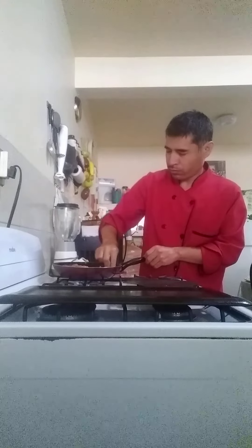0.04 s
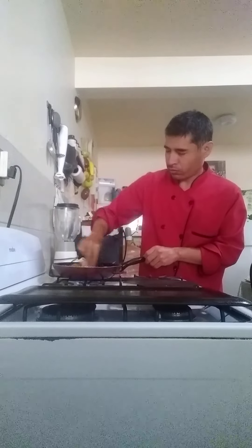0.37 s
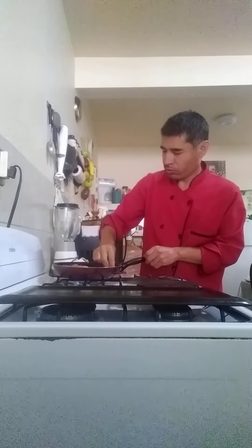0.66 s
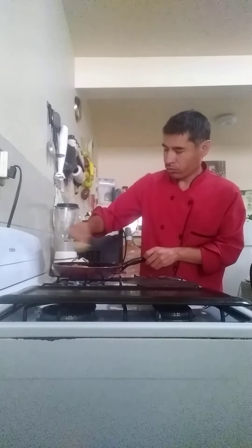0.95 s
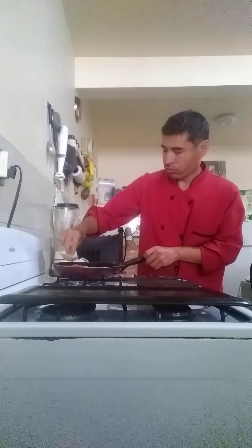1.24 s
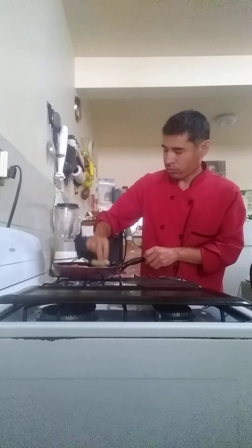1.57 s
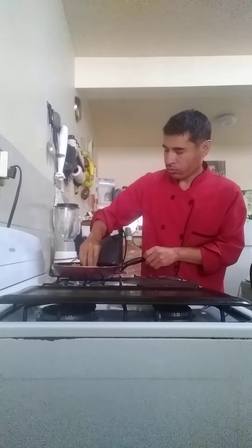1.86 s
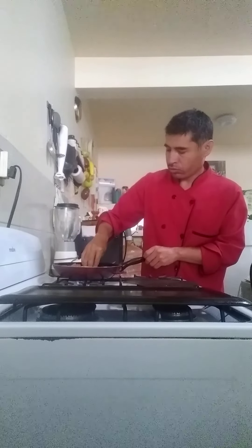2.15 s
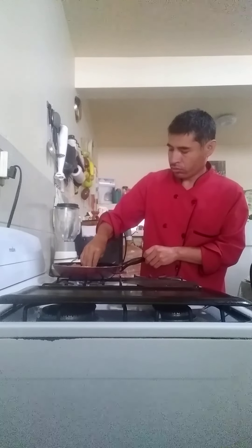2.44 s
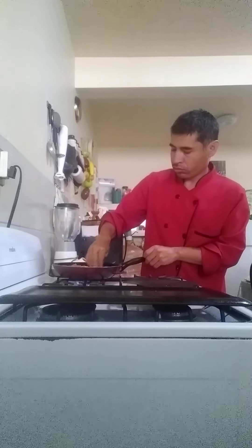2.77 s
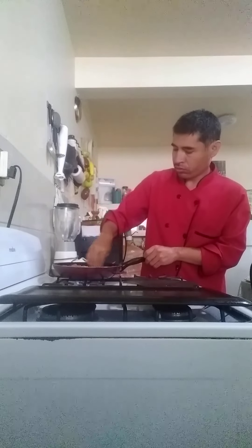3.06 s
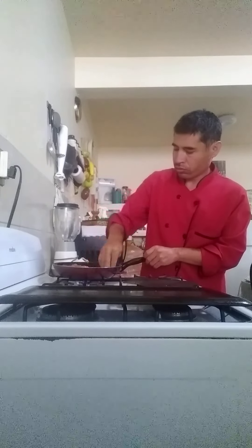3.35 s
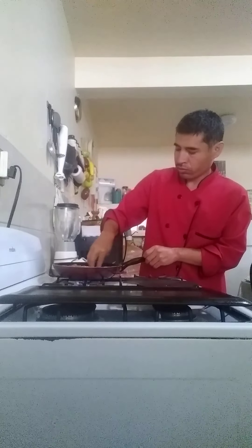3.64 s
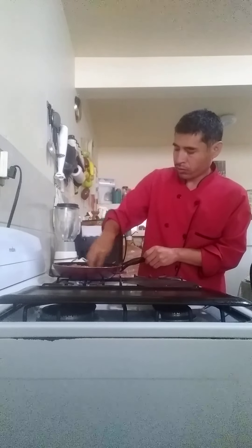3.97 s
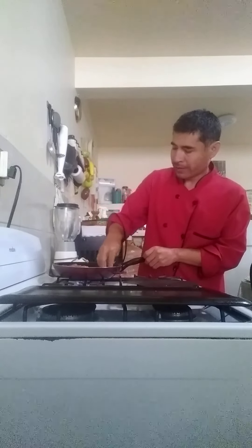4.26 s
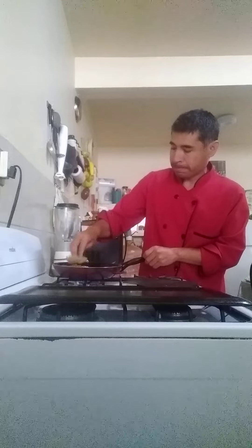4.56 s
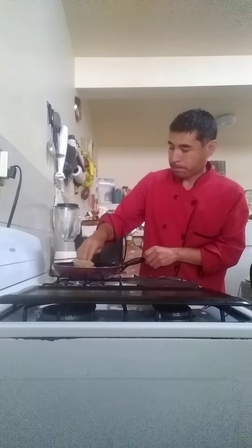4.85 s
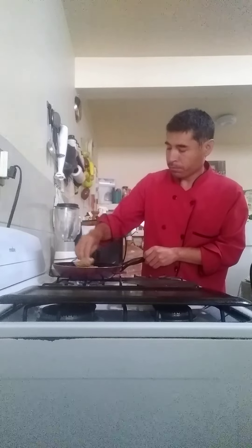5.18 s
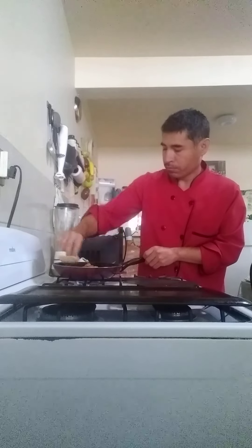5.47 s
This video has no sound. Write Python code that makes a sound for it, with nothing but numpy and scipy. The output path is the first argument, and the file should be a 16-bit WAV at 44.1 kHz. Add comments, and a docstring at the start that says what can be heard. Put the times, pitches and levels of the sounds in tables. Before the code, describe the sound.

A frying pan clanks and rattles on a stove grate while food is wiped around it with a soft, scratchy hiss.

```python
"""Wiping food round a loose frying pan

In a hard-walled kitchen, each push of the cook's hand tips the pan against the stove grate. The impact
excites the pan's modes: a dull clack when it is held down, a ringing clank when it rocks free.
Friction of the food on the pan floor makes a hiss. A few bright ticks sound, from the pan touching
the grate again or during the wiping. A faint tone swells twice, and low room noise lies under it all."""
import sys
import numpy as np
from scipy import signal
from scipy.fft import rfft, irfft
from scipy.io import wavfile
from scipy.ndimage import uniform_filter1d

SR = 44100
rng = np.random.default_rng(int(sys.argv[2]) if len(sys.argv) > 2 else 0)


def master_out(mix):
    """Clip the mix to full scale and print it as 16-bit PCM to the path in sys.argv[1]."""
    frames = np.transpose(np.atleast_2d(mix))
    ceiling = np.clip(frames, -1, 1)
    pcm = np.round(ceiling * 32767).astype(np.int16)
    wavfile.write(sys.argv[1], SR, pcm)


N = 247401


def amp(db):
    return 10 ** (np.asarray(db) / 20)


def unit(x):
    return x / np.sqrt(np.mean(x ** 2) + 1e-20)


def curve_at(points, hz):
    f, value = np.transpose(points)
    return np.interp(np.log(hz + 1), np.log(f + 1), value)


def bins(x):
    return np.fft.rfftfreq(x.shape[-1], 1 / SR)


def colour(x, points):
    """Zero-phase filtering by a curve of (frequency [Hz], gain [dB])."""
    return irfft(rfft(x) * amp(curve_at(points, bins(x))), x.shape[-1])


def add(mix, time_s, sound):
    start = round(time_s * SR)
    sound = sound[:, max(-start, 0):]
    part = mix[:, max(start, 0):][:, :sound.shape[1]]
    part += sound[:, :part.shape[1]]


def wander(rate_hz):
    """Random modulation: low-passed noise of unit rms."""
    noise = rng.standard_normal(N)
    return unit(irfft(rfft(noise) / (1 + (bins(noise) / rate_hz) ** 4), N))


# likeness of sound at the two microphone ports: (frequency [Hz], correlation [-1..1])
COHERENCE = [(60, 0), (125, .55), (250, .78), (600, .88), (1100, .97), (1500, .7), (1750, .2), (2100, .9),
             (2250, .995), (2400, .94), (2550, .7), (2780, .15), (3350, .98), (3950, .55), (4300, .92),
             (4450, .98), (4650, .85), (5050, .35), (5550, .85), (6200, .55), (6700, .7), (10000, .28),
             (14000, .3)]
def diffuse(size, coherence=COHERENCE):
    """A diffuse field: noise from all round is only partly coherent at two points."""
    noise = rng.standard_normal((2, size))
    common, separate = rfft(noise)
    alike = np.clip(curve_at(coherence, bins(noise)), -1, 1)
    return irfft(np.array([common, alike * common + np.sqrt(1 - alike ** 2) * separate]), size)


# decay of sound in the kitchen: (frequency [Hz], t60 [s])
REVERB_TIMES = [(100, 1), (260, 0.798), (700, 0.5786), (1800, 0.4046), (4500, 0.67215), (12000, 0.37806)]
def kitchen(x, build_s=0.01006):
    """Reverberation: wall reflections build up, then each band decays exponentially at its own rate."""
    hz, t, bands = signal.stft(diffuse(SR), SR, nperseg=256)
    decay = amp(-60 * t / curve_at(REVERB_TIMES, hz)[:, None])
    onset = 1 - np.exp(-(t / build_s) ** 2)
    tail = signal.istft(bands * decay * onset, SR, nperseg=256)[1]
    return signal.fftconvolve(x, tail / np.linalg.norm(tail[0]), axes=1)[:, :x.shape[1]]


# short-lived modes of metal striking metal: (frequency [Hz], t60 [s], level [dB])
CRACK_MODES = [(901.9, 0.0378, 1), (1146.4, 0.03439, 2), (1399.2, 0.034, 0.5), (1560.4, 0.03259, 0.5),
               (2035.9, 0.04227, -5.5), (2371.3, 0.03137, -5.5), (2755.5, 0.03824, -9.5),
               (3710, 0.06178, -12), (5702.3, 0.0347, -18)]
def crack(t, detune=0.01826, rise_s=0.000448):
    """Impulse excitation: the contact starts all its modes at the same instant."""
    hz, t60, db = np.transpose(CRACK_MODES)[:, :, None]
    hz = hz * (1 + detune * rng.uniform(-0.8896, 1, hz.shape))
    modes = amp(db - 60 * t / t60) * np.sin(2 * np.pi * (hz * t + rng.random(hz.shape)))
    return modes.sum(0) * (1 - np.exp(-t / rise_s))


# crowded resonances of the stove top: (frequency [Hz], spectral level [dB])
STOVE_SPECTRUM = [(45, -37.5), (110, -15), (230, -6), (600, 2.5), (1000, -3.5), (1800, -5), (2200, -10.5),
                  (2700, -4.5), (3900, -15.5), (6000, -20.5), (8000, -27.5), (14000, -39.5)]
def clatter(t, rise_s=0.007003, decay_s=0.02262, buzz_s=0.08617, buzz_db=-14):
    """Modal overlap: dense resonances merge into noise, with a short buzz as the pan settles."""
    decay = np.exp(-t / decay_s) + amp(buzz_db) * np.exp(-t / buzz_s)
    return colour(diffuse(len(t)), STOVE_SPECTRUM) * decay * (1 - np.exp(-t / rise_s))


# modes of pan and grate: (frequency [Hz], unscaled t60 [s], level held [dB], level free [dB])
PAN_MODES = [(111.09, 0.6805, -18.5, -18), (226.31, 0.32665, -3.5, -15), (336.91, 0.5462, -3, -12),
             (463.82, 0.516, -19, -3.5), (513.77, 0.371, -6.5, -8), (597.56, 0.173, -7.5, -15.5),
             (728.18, 0.1846, -9, -2), (817.44, 0.16085, -5, -.5), (887.54, 0.1725, -12.5, -3.5),
             (910.8, 0.21287, -4.5, 6.5), (935.67, 0.1977, 0.5, -4.5), (973.3, 0.3583, -14.5, -5),
             (1139.9, 0.1633, 0.5, -18.5), (1239.6, 0.2127, 0, -14), (1298.2, 0.1716, -3, -19),
             (1453.6, 0.13106, -2.5, -2.5), (1548.6, 0.13496, -3.5, -6), (1744, 0.2538, -10, -9.5),
             (1994.9, 0.08836, 0.5, -18), (2077.7, 0.229, -19.5, -13.5), (2476, 0.1015, -10, -2.5),
             (2530.3, 0.2373, -10.5, -2.5), (2693, 0.1701, -17.5, -14), (3123.4, 0.4192, -16, 1.5),
             (4047.7, 0.3735, -22.5, -2), (4381, 0.25, -26, -12)]
ROCK_HZ, ROCK_RAD = 28.131, 0.548  # a free pan shivers: mean rate, depth of phase modulation
RIM_HZ, RIM_SWELL_S = 2900, 0.03847  # higher modes lie in the rim, which the blow reaches late
def pan_ring(t, freedom, held_sustain=0.6684, free_extra=0.273, build_cycles=0.5537, detune=0.003948):
    """Damped modal vibration: the hand shortens the pan's ring, and rocking makes it waver."""
    hz, t60, held_db, free_db = np.transpose(PAN_MODES)[:, :, None]
    phase, rock_phase, rock_speed = rng.random((3, len(PAN_MODES), 1))
    scatter_db, shift = rng.standard_normal((2, len(PAN_MODES), 1))
    hz = hz * (1 + detune * shift)  # the pan never lands twice on the same spot
    t60 = t60 * (held_sustain + free_extra * freedom)
    db = held_db + freedom * (free_db - held_db) + scatter_db
    envelope = amp(db - 60 * t / t60) / np.sqrt(t60)
    envelope *= 1 - np.exp(-t * hz / build_cycles)  # low modes swell more slowly
    envelope *= np.where(hz > RIM_HZ, (1 - np.exp(-t / RIM_SWELL_S)) ** 4, 1)
    sway = freedom * ROCK_RAD * np.sin(2 * np.pi * (ROCK_HZ * (.5 + rock_speed) * t + rock_phase))
    path_rad = rng.uniform(-0.5564, 0.4929, (2, len(PAN_MODES), 1))  # from each mode to each port
    angle = 2 * np.pi * (hz * t + phase) + sway + path_rad
    return (envelope * np.sin(angle.astype(np.float32))).sum(1)


def knock(level_db, freedom, firm_db=-33.5, ring_room_db=-5, clack_room_db=-2):
    """One impact excites crack, clatter and ring; a softer blow has more bass and less treble."""
    def by_freedom(held, free):
        return held + freedom * (free - held)

    size = SR * 2 // 3
    t = np.arange(size) / SR
    clack = amp(by_freedom(held=-1.5, free=-6)) * unit(clatter(t))
    clack += amp(by_freedom(held=-1, free=-11)) * unit(crack(t))
    ring = unit(pan_ring(t, freedom))
    sound = ring + clack + kitchen(amp(ring_room_db) * ring + amp(clack_room_db) * clack)
    softness_db = max(firm_db - level_db, 0)
    bass_db = by_freedom(held=5, free=0) + 0.331 * softness_db
    treble_db = by_freedom(held=0.1509, free=-3) - 1.4892 * softness_db
    padded = np.pad(sound, ((0, 0), (0, SR - size)))
    sound = colour(padded, [(280, bass_db), (600, 0), (1650, 0), (2400, treble_db)])[:, :size]
    return amp(level_db) * sound / np.std(sound[:, t < .04])


# blows of pan on grate: (time [s], level [dB], freedom [0 held down to 1 rocking free])
PAN_BLOWS = [(-0.035, -30, 0.6458), (0.2447, -30, 0), (0.4362, -40, 0), (0.5355, -30.5, 0.7845),
             (0.9457, -57.5, 0.046), (1.0428, -60.5, 0.0052), (1.3445, -59, 0.705), (1.4707, -59, 0.6595),
             (1.643, -43.5, 0.1707), (1.696, -47, 0.0997), (1.772, -41, 0.046), (3.0618, -33.5, 0),
             (3.3544, -26, 0.8465), (3.6487, -32.5, 0.025), (3.8361, -27.5, 1), (4.038, -30, 0.172),
             (4.1917, -28.5, 0.826), (4.6543, -43.5, 0.7156), (4.742, -35, 0.1577), (4.8624, -45.5, 0.489),
             (4.8967, -42.5, 0.7805), (5.3616, -57.5, 0.7944)]
def knocks():
    """Superposition: the impacts add up as the pan tips to and fro."""
    out = np.zeros((2, N))
    for time_s, level_db, freedom in PAN_BLOWS:
        add(out, time_s, knock(level_db, freedom))
    return out


# strokes of the food over the pan:
# (time of top speed [s], level [dB], 10 dB swell [s], 10 dB fade [s], extra top treble [dB])
FOOD_STROKES = [(0.01, -51, 1.7935, 0.1124, -1), (0.24, -54.5, 0.3421, 0.0542, -0.5),
                (0.49, -55.5, 0.002, 0.0965, 3), (0.59, -48.5, 0.0385, 0.1215, -3),
                (0.784, -54, 0.1669, 0.1316, 3), (1.16, -68, 0.1074, 0.2532, 2.5),
                (1.69, -59, 0.0138, 0.2894, 0.5), (2.93, -59, 0.1826, 0.0011, -2),
                (3.1, -52.5, 0.0526, 0.0989, 0), (3.35, -50.5, 0.134, 0.084, 0),
                (3.4, -49.5, 0.036, 0.1031, 1), (3.61, -50.5, 0.0905, 0.0949, 1.5),
                (3.845, -50.5, 0.062, 0.0819, 1.5), (4.0, -48, 0.093, 0.0986, 0.5),
                (4.2, -49.5, 0.0785, 0.1631, -1), (4.7, -64.5, 0.0066, 0.2917, 2.5),
                (4.901, -54, 0.0446, 0.2833, 0.5), (5.6, -57, 0.0948, -2.2586, 1)]
def wiping(t, brightness=0, resting_db=-69.5):
    """Incoherent addition: the strokes and a light steady sliding sum in power to one envelope."""
    peak_s, db, swell_s, fade_s, fizz_db = np.transpose(FOOD_STROKES)[:, :, None]
    drop_db = 10 * np.maximum((peak_s - t) / swell_s, (t - peak_s) / fade_s)
    strokes = amp(db + brightness * fizz_db - drop_db)
    return np.sqrt((strokes ** 2).sum(0) + amp(resting_db) ** 2)


def rasp(x, depth_db=3, width_bins=3, length_frames=9):
    """Spectral modulation: random, brief narrow-band patches make the hiss rasp."""
    bands = signal.stft(x, nperseg=512, noverlap=384)[2]
    patches = uniform_filter1d(rng.standard_normal(bands.shape[1:]), width_bins, 0)
    patches = uniform_filter1d(patches, length_frames, 1)
    return signal.istft(bands * amp(depth_db * unit(patches)), nperseg=512, noverlap=384)[1][:, :N]


# hiss of food on metal: (frequency [Hz], spectral level [dB])
FRICTION_SPECTRUM = [(45, -40), (100, -23), (500, -23.5), (1300, -14.5), (2000, -10.5), (3200, 6),
                     (5000, -0.5), (7300, 2.5), (9500, -6), (12500, -5), (14200, -10)]
def rubbing(hiss_db=1.5, grit_db=-7, crumbs_per_s=260, slips_per_s=600, slip_db=1, room_db=-3):
    """Sliding friction: a hiss, crackling crumbs, and tiny slips that drive the pan's modes."""
    t = np.arange(N) / SR
    stroke = wiping(t)
    grainy_noise = diffuse(N) * amp(-wander(300))
    hiss = unit(rasp(colour(grainy_noise, FRICTION_SPECTRUM)))
    crumbs = rng.uniform(0.1491, 1, N) ** 2 * (rng.random(N) < crumbs_per_s / SR)
    bursts = signal.fftconvolve(crumbs, np.exp(-t[:SR // 100] / 0.0006093))[:N]
    grit = unit(colour(diffuse(N) * bursts, FRICTION_SPECTRUM))
    slips = rng.uniform(-1.0501, 1, (1, N)) * (rng.random(N) < slips_per_s / SR)
    slips = colour(slips, [(120, -17.5), (450, -5), (1300, -1), (2000, 2.5)])
    damped_pan = pan_ring(t[:SR // 4], freedom=0.2992, held_sustain=0.07444, free_extra=0.0401)
    body = unit(signal.fftconvolve(slips, damped_pan, axes=1)[:, :N]) * stroke
    body += amp(room_db) * kitchen(body)
    scrape = amp(hiss_db) * hiss + amp(grit_db) * grit
    fizz = colour(scrape, [(6500, -30), (9000, 0)])
    return (scrape - fizz) * stroke + fizz * wiping(t, brightness=1) + amp(slip_db) * body


# low room noise and high hiss: (frequency [Hz], spectral level [dB])
WASH_SPECTRUM = [(43, -38.5), (56, 5.5), (80, 0), (195, -2.5), (235, 0), (285, -3.5), (550, -2),
                 (900, -10.5), (1900, -19), (2400, -27)]
HISS_SPECTRUM = [(30, -24), (1200, -4.5), (3200, 0), (5000, -1.5), (7300, 0.5), (9500, -4), (14200, -9)]
# likeness of the low noise at the two ports: (frequency [Hz], correlation [-1..1])
WASH_COHERENCE = [(240, -0.2942), (600, 0.6551), (1100, 0.9843), (1450, 0.113), (2200, 1)]
def room_noise(wash_db=-58.5, hiss_db=-63, swell_db=2.5, flutter_db=1.5):
    """Amplitude-modulated noise: a low wash swells a little and the hiss above it flickers."""
    wash = unit(colour(diffuse(N, WASH_COHERENCE), WASH_SPECTRUM))
    wash *= amp(wash_db + swell_db * wander(3.284))
    hiss = unit(colour(diffuse(N), HISS_SPECTRUM))
    return wash + hiss * amp(hiss_db + flutter_db * wander(37.8))


# the pan touching the grate again just after a knock, and small snaps while wiping:
# (time [s], level [dB], centre [Hz], half-width [octaves], decay [s])
BRIGHT_TICKS = [(0.2532, -42.5, 5626, 0.1106, 0.00387), (1.1514, -51, 6382, 0.1956, 0.00503),
                (1.4019, -49.5, 9273, 1, 0.001766), (3.07, -45, 5859, 0.1325, 0.006074),
                (3.5646, -50, 8200, 0.745, 0.00525), (4.8695, -47, 8123, 0.2078, 0.00315),
                (5.1013, -51, 9356, 0.88, 0.00148)]
def ticks(room_db=-4):
    """Band-limited transients: each tick is a bright noise burst that decays exponentially."""
    out, t = np.zeros((2, N)), np.arange(2048) / SR
    for time_s, db, hz, octaves, decay_s in BRIGHT_TICKS:
        band = np.exp(-(np.log2((bins(t) + 1) / hz) / octaves) ** 2)
        tick = irfft(rfft(diffuse(len(t))) * band) * np.exp(-t / decay_s)
        add(out, time_s, amp(db) * tick / np.std(tick[:, t < .003]))
    return out + amp(room_db) * kitchen(out)


# swells of a faint tone: (peak time [s], relative level [dB])
TONE_SWELLS = [(2.44, -54), (2.94, -59)]
TONE_HZ, TONE_RISE_HZ_PER_S = 625.4, 65  # pitch at the first swell, and its climb
def thin_tone(swell_s=0.13046, waver=.025, flutter_db=2.5, gain_db=-2.3, room_db=-9):
    """Random frequency and amplitude modulation make a slowly rising sine unsteady."""
    t = np.arange(N) / SR
    hz = TONE_HZ + TONE_RISE_HZ_PER_S * (t - TONE_SWELLS[0][0])
    cycles = np.cumsum(hz * (1 + waver * wander(82.02))) / SR
    swells = sum(amp(db - 10 * ((t - peak_s) / swell_s) ** 4) for peak_s, db in TONE_SWELLS)
    envelope = swells * amp(gain_db + flutter_db * wander(40.16))
    tone = envelope * np.sin(2 * np.pi * cycles) * np.ones((2, 1))
    return tone + amp(room_db) * kitchen(tone)


# brief clattering pulses just after some knocks: (time [s], level [dB])
CLATTER_PULSES = [(3.3775, -37.5), (3.39, -36), (3.863, -37.5), (4.0672, -35)]
def clatter_pulses(decay_s=0.00469, room_db=-5):
    """Exponential decay: dull noise bursts with the clatter's spectrum die within milliseconds."""
    out, t = np.zeros((2, N)), np.arange(2048) / SR
    for time_s, db in CLATTER_PULSES:
        pulse = colour(diffuse(len(t)), STOVE_SPECTRUM) * np.exp(-t / decay_s)
        add(out, time_s, amp(db) * pulse / np.std(pulse[:, t < .005]))
    return out + amp(room_db) * kitchen(out)


def scene():
    """Linear superposition: the pressures of all sources add."""
    return knocks() + clatter_pulses() + rubbing() + ticks() + thin_tone() + room_noise()


# phase difference between the ports: (frequency [Hz], lead of left [rad])
PORT_PHASE = [(330, 0), (620, -.7), (1050, 0), (1550, .3), (1750, 1.6), (2000, 2.7), (2150, 3.05),
              (2400, 3.2), (2550, 3.35), (3100, 6), (3600, 6.5), (4400, 9.3), (5500, 12.6), (6550, 15.7),
              (8900, 22), (11200, 28.3), (14000, 34)]
# level difference between the ports: (frequency [Hz], left minus right [dB])
PORT_BALANCE = [(80, -1.5), (300, 2.5), (1500, 0.2605), (3000, -0.43), (8300, 1), (10500, -0.5),
                (12500, -3.5), (14000, -3.5)]
def record(dry, cutoff_hz=14280):
    """Two-point reception: the ports differ in phase and level, and a low-pass limits the band."""
    padded = np.pad(dry, ((0, 0), (0, SR // 10)))
    hz = bins(padded)
    left = amp(curve_at(PORT_BALANCE, hz) / 2)
    right = np.exp(-1j * curve_at(PORT_PHASE, hz)) / left
    ports = irfft(rfft(padded) * np.array([left, right]), padded.shape[1])[:, :N]
    lowpass = signal.firwin(511, cutoff_hz, window=("kaiser", 9), fs=SR)
    return signal.oaconvolve(ports, lowpass[None], "same")


dry = scene()
out = record(dry)
master_out(out)
```